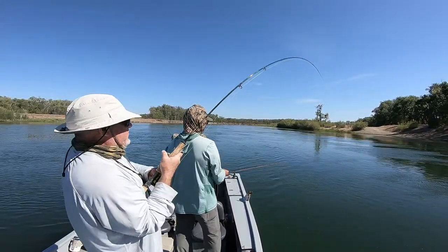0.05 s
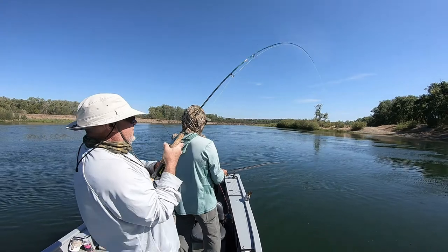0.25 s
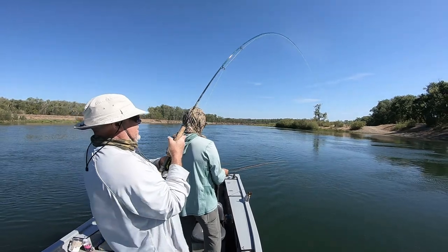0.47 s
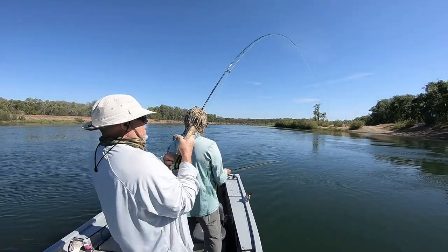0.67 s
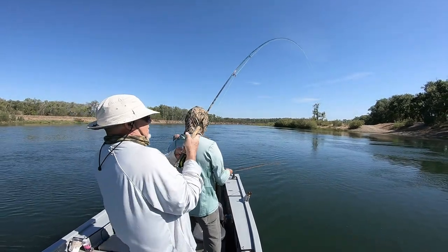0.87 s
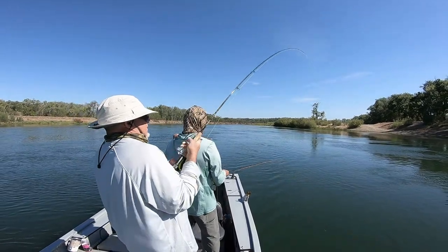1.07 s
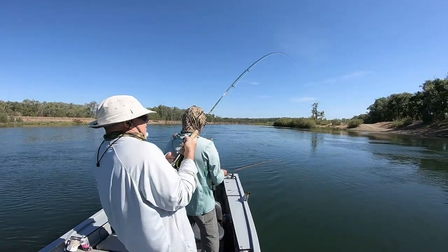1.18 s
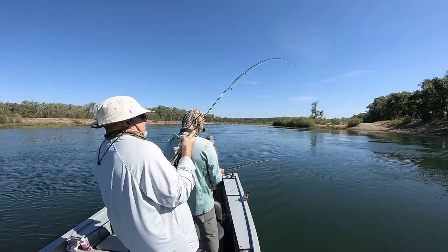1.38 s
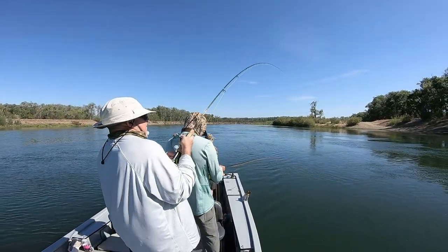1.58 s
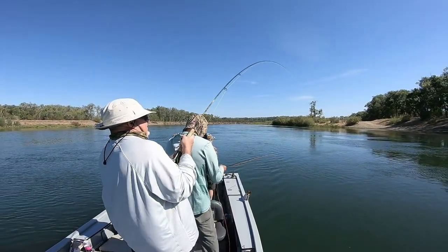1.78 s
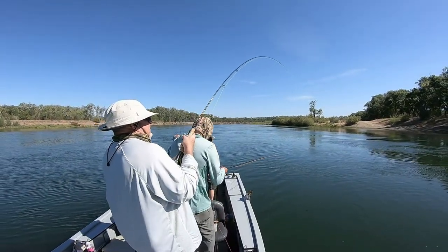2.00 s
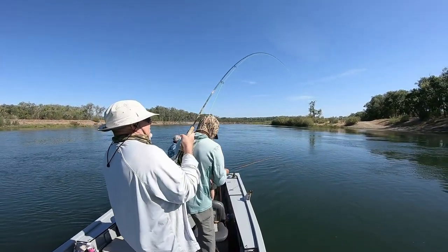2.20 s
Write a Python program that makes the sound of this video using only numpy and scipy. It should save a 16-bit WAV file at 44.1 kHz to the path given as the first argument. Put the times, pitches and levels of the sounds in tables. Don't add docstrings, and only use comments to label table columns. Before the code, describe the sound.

A fishing reel's ratchet clicks, close and outdoors on a small boat. Faint hull knocks and wind rumble, strongest near 0.3 s, come first. A soft double tick falls at 0.4 s, then crisp metallic clicks from 0.6 s, dense and uneven from 0.8 to 1.8 s, with tiny rings. Low gusts buffet each side around 0.9-1.6 s. Light hull knocks and fading wind follow over faint water hiss.

```python
import sys
import numpy as np
from scipy import signal
from scipy.fft import rfft, irfft
from scipy.io import wavfile

SR = 44100
rng = np.random.default_rng(int(sys.argv[2]) if len(sys.argv) > 2 else 0)


def gain_from_db(level_db):
    decades = np.asarray(level_db, float) / 20
    return 10 ** decades


def pcm_store(signal):
    levels = np.round(np.clip(np.atleast_2d(signal), -1, 1) * 32767)
    wavfile.write(sys.argv[1], SR, levels.astype(np.int16).T)


N = 99225

# start_s [s], peak_db [dB], snap_hz [Hz], most excited frame pitch ring_hz [Hz]
PAWL_DROPS = [(0.4217, -51, 4550, 6400), (0.4396, -39, 6060, 2840), (0.6201, -33, 6150, 2470),
              (0.6856, -33, 6050, 5300), (0.7745, -30.5, 6700, 6550), (0.8004, -47, 5400, 5300),
              (0.8305, -33.5, 6600, 6230), (0.8696, -30.5, 7370, 6700), (0.9361, -32.5, 6720, 6800),
              (0.9946, -34.5, 6500, 6800), (1.0297, -31, 6000, 6750), (1.0727, -39, 5700, 6450),
              (1.0799, -29, 6350, 6300), (1.1659, -31.5, 5720, 5290), (1.2049, -32.5, 4550, 7040),
              (1.2114, -29.5, 7610, 7550), (1.2439, -32, 8060, 7400), (1.2866, -32.5, 7630, 6400),
              (1.3257, -34, 5840, 6350), (1.3607, -33.5, 4800, 6550), (1.4171, -32, 5960, 6600),
              (1.4834, -33, 5160, 6500), (1.5225, -37, 4800, 5400), (1.5531, -30, 6050, 5250),
              (1.6101, -32, 7600, 6500), (1.6809, -38, 5900, 6510), (1.7392, -32, 6630, 6860),
              (1.8137, -36, 6800, 6800)]
# start_s [s], peak_db [dB], snap_hz [Hz]
PAWL_SLIPS = [(0.617, -42, 7160), (0.6788, -52, 7000), (0.7695, -39, 7700), (0.8286, -51, 7700),
              (0.8676, -44, 7060), (0.8785, -45, 8300), (0.9298, -41.5, 6800), (0.993, -45, 6660),
              (1.0272, -39.5, 7200), (1.0633, -47, 4960), (1.163, -45, 5840), (1.208, -34.5, 4480),
              (1.2423, -49, 8450), (1.2845, -41, 7200), (1.3234, -34.5, 6840), (1.358, -45.5, 7000),
              (1.4133, -41.5, 7060), (1.4811, -35.5, 6700), (1.5487, -43, 7000), (1.6062, -38.5, 7560),
              (1.677, -48, 7700), (1.7368, -42, 4540), (1.807, -44, 6200)]
# pitch_hz [Hz], level_db [dB]
FRAME_MODES = [(2300, -2), (2880, -1), (3400, -3), (4490, -4), (5290, 0), (6450, 0), (7080, -2), (7850, -2),
               (8400, -3), (9100, -5)]
# frequency_hz [Hz], density_db [dB per Hz]
CRACK_COLOUR = [(1900, -41.5), (2350, -7), (3800, -10), (6500, -3), (8500, -3.5), (10500, -20.5),
                (13000, -20.5), (15500, -23)]
# start_s [s], peak_db [dB], pitch_hz [Hz]
SPOOL_BODY = [(0.4209, -55.5, 2810), (0.4394, -43.5, 2840), (0.619, -43, 2296), (0.6843, -49, 3470),
              (0.7731, -43.5, 2520), (0.8295, -49, 3220), (0.8689, -57, 3300), (0.9353, -47.5, 2730),
              (0.9941, -48.5, 2290), (1.0291, -39, 2510), (1.0715, -50, 3280), (1.0789, -40.5, 2850),
              (1.1653, -44.5, 2390), (1.2047, -43, 2580), (1.2104, -47, 2330), (1.2426, -44, 3270),
              (1.2865, -43.5, 3300), (1.3249, -49, 2700), (1.3598, -47, 2220), (1.4162, -43, 2730),
              (1.4825, -45, 2400), (1.5214, -54, 2390), (1.5519, -46, 3320), (1.6087, -43, 2394),
              (1.6791, -50.5, 2940), (1.7384, -72, 3600), (1.8133, -59, 2570)]
# start_s [s], peak_db [dB], pitch_hz [Hz]
SPOOL_FLANGE = [
    (0.619, -45.5, 4340),
    (0.6849, -47.5, 4040),
    (0.775, -59, 4350),
    (0.8275, -62, 4500),
    (1.0274, -41.5, 4360),
    (1.3249, -40, 4460),
    (1.6092, -46, 4360),
    (1.7357, -60, 4400),
]
# start_s [s], peak_db [dB], pitch_hz [Hz]
SPRING_GLINTS = [(.438, -48, 11270), (.619, -37, 9750), (.685, -49, 10900), (.8286, -40.5, 10270),
                 (.868, -41.5, 11400), (.9936, -43, 12200), (1.0794, -35.5, 9340), (1.2108, -58, 14700),
                 (1.2431, -46.5, 10200), (1.286, -42, 12000), (1.483, -42, 9900), (1.5524, -41.5, 10460)]
# centre_s [s], level_db [dB], pitch_hz [Hz]
LEFT_EDDIES = [(0.26, -22.5, 68), (0.299, -14.5, 99.3), (0.375, -14, 105.3), (0.318, -33.5, 373),
               (0.462, -28.5, 114), (0.485, -26, 95), (0.633, -34.5, 63), (0.935, -32.5, 168),
               (1.025, -21, 63.7), (1.064, -28, 75.5), (1.111, -18.5, 79.5), (2.02, -33, 130),
               (1.478, -29, 91), (1.515, -24, 95), (1.537, -22.5, 79), (1.599, -27, 99), (1.893, -30, 143)]
# centre_s [s], level_db [dB], pitch_hz [Hz]
RIGHT_EDDIES = [(0.206, -20.5, 79.4), (0.265, -32.5, 161), (0.235, -18, 99.5), (0.274, -15.5, 98),
                (0.325, -9.5, 159), (0.417, -33, 72.8), (0.455, -24.5, 126.7), (0.524, -50, 74.6),
                (0.562, -22.5, 71.6), (0.607, -54, 68.4), (0.881, -19, 69), (0.944, -14, 85),
                (1.008, -16, 131), (1.052, -14, 81), (1.106, -18.5, 131), (1.136, -15.5, 61),
                (1.175, -22, 78), (1.212, -22, 84), (1.264, -12.5, 104), (1.3, -18, 64),
                (1.392, -20.5, 131.5), (1.474, -17.5, 58), (1.547, -10, 86.4), (1.723, -24, 70),
                (1.867, -26, 135), (1.975, -22, 69)]
# start_s [s], level_db [dB], left_minus_right_db [dB]
AIRFLOW = [(0, -41.5, -4), (.13, -48, -1), (.24, -31.5, -3.5), (.6, -29.5, -5), (.8, -43.5, -6.5),
           (.95, -30, -6.5), (1.25, -31.5, -1.5), (1.34, -41.5, -8.5), (1.5, -24, -7.5), (1.68, -43, -6.5),
           (1.9, -30, -5), (2.2, -41, -3)]
# frequency_hz [Hz], density_db [dB per Hz]
AIRFLOW_COLOUR = [(20, -5), (45, 0), (150, -6), (330, -30.5), (600, -40), (1500, -72)]
# start_s [s], level_db [dB], t60_s [s], tilt_db [dB per octave]
HULL_KNOCKS = [
    (.004, -49, 0.49, 3.5),
    (0.041, -45, 0.11, 5.5),
    (0.107, -46.5, 0.29, -0.5),
    (0.471, -51, 0.32, 3.5),
    (0.543, -44.5, 0.23, 1.5),
    (1.838, -37.5, 0.24, 2),
    (1.872, -53.5, 0.5, 4.5),
    (1.915, -56.5, 0.32, 6),
    (1.997, -47, 0.25, -1.5),
]
# frequency_hz [Hz], density_db [dB per Hz]
HULL_COLOUR = [(150, -17.5), (300, 3), (600, 5.5), (1100, -3), (3000, -23), (4400, -32.5), (6100, -28.5),
               (12000, -57)]
# start_s [s], level_db [dB], t60_s [s], pitch_hz [Hz]
PANEL_HUMS = [
    (.006, -48.5, 0.26, 866),
    (.006, -54, 0.23, 586),
    (.04, -49, 0.092, 1110),
    (.108, -50, 0.33, 432),
    (1.105, -41, 0.36, 591),
    (1.36, -53, 0.38, 866),
    (1.36, -47, 0.28, 624),
    (1.41, -42, 0.2, 570),
    (1.525, -35.5, 0.09, 480),
]
# start_s [s], whirr_db [dB], river_db [dB]
BED_LEVELS = [(0, -74.5, -66.5), (.6, -76, -64.5), (.9, -69.5, -63), (1.05, -73, -53.5),
              (1.4, -70.5, -54.5), (1.65, -70, -67), (1.8, -77, -72.5), (1.92, -75, -73), (2.1, -80.5, -72)]
# frequency_hz [Hz], density_db [dB per Hz]
RIVER_COLOUR = [(250, -6.5), (800, 4.5), (1100, -2.5), (3000, -10), (6400, -19), (13000, -50),
                (16000, -47.5)]
# frequency_hz [Hz], density_db [dB per Hz]
WHIRR_COLOUR = [(1500, -3.5), (2500, 7.5), (4200, 5.5), (5200, 0), (6300, 8.5), (9000, -0.5), (12000, -8),
                (16000, -45)]
# frequency_hz [Hz], phase by which left leads lead_rad [rad]
PORT_LEAD = [(340, 1.24), (1200, 2.56), (2300, 1.2), (4000, 0.62), (7000, 1.43), (13000, 0.26)]

SNAP_S, SNAP_DB = 0.00045, -3
CRACK_DB, CRACK_T60_S, FOCUS_DB = -4, 0.0045, 5
RATTLE_DB, RATTLE_T60_S = -21, 0.04
RING_DB, RING_T60_S, PICK_DB = -13, 0.03, 40
BODY_T60_S, BODY_WIDTH_HZ = 0.024, 200
GLINT_T60_S, GLINT_WIDTH_HZ = 0.015, 1800
EDDY_S, EDDY_TRIM_DB = 0.058, -1
EDDY_FALL_DB, EDDY_RISE_DB, EDDY_TOP = 21, 1, 1.33
LEAK_DB, LEAK_HZ = -9.5, 230
RIVER_FOLLOWS, LOOSE_DB = 0.54, -5
REEL_PAN_DB, HULL_PAN_DB, UNLIKE_DB = -3, -4, -6


def at_hz(points, hz):
    f, v = np.transpose(points)
    return np.interp(np.log(np.maximum(hz, 1)), np.log(f), v)


def in_time(rows):
    s, *columns = np.transpose(rows)
    return [np.interp(np.arange(N) / SR, s, c) for c in columns]


def coloured(size, db_at):
    hz = np.arange(size // 2 + 1) * SR / size + 0.0019
    x = irfft(rfft(rng.standard_normal(size)) * gain_from_db(db_at(hz)), size)
    return x / np.sqrt(np.mean(x ** 2))


def resonance(hz, width_hz):
    return lambda f: -20 * np.log10(1 + ((f - hz) / width_hz) ** 2)


def flicker(rate_hz, depth_db):
    points = rng.standard_normal(400)
    return gain_from_db(depth_db * np.interp(np.arange(N) * rate_hz / SR, np.arange(400), points))


def add(out, start_s, piece):
    i = max(int(start_s * SR), 0)
    out[..., i:i + piece.shape[-1]] += piece[..., :out.shape[-1] - i]


def dying(t60_s, rise_s, size):
    t = np.arange(size) / SR
    return (1 - np.exp(-(t / rise_s) ** 2)) * gain_from_db(-60 * t / t60_s)


def ports(x, pan_db):
    turn = np.exp(0.5j * at_hz(PORT_LEAD, np.arange(N // 2 + 1) * SR / N))
    left = irfft(rfft(x) * turn, N) * gain_from_db(pan_db / 2)
    right = irfft(rfft(x) / turn, N) * gain_from_db(-pan_db / 2)
    return np.array([left, right])


def contact_crack(snap_hz, focus_db):
    patches = 5.8 * rng.standard_normal(24)

    def colour(f):
        focus = -focus_db * np.log2(f / snap_hz) ** 2
        return at_hz(CRACK_COLOUR, f) + focus + np.interp(f / 1000, np.arange(24), patches)

    noise = np.array([coloured(4096, colour) for _ in range(3)])
    return gain_from_db(CRACK_DB) * noise * dying(CRACK_T60_S, 0.00015, size=4096)


def contact_rattle():
    lumps = gain_from_db(4 * np.repeat(rng.standard_normal(128), 32))
    noise = np.array([coloured(4096, lambda f: at_hz(CRACK_COLOUR, f) - f / 1500) for _ in range(3)])
    return gain_from_db(RATTLE_DB) * noise * lumps * dying(RATTLE_T60_S, 0.00044, size=4096)


def frame_ring(favoured_hz):
    hz, db = np.transpose(FRAME_MODES)[:, :, None]
    pick_db = -np.minimum(PICK_DB * np.abs(np.log2(hz / favoured_hz)), 16)
    gain = gain_from_db(db + RING_DB + pick_db + rng.normal(0, 2, hz.shape))
    detuned_hz = hz * rng.normal(1, 0.012, hz.shape)
    modes = gain * np.sin(2 * np.pi * detuned_hz * np.arange(4096) / SR)
    return modes.sum(axis=0) * dying(RING_T60_S, 0.0004, size=4096)


def reel():
    near, loose, t = np.zeros(N), np.zeros((2, N)), np.arange(4096) / SR
    slips = [(s, level, pitch, 0) for s, level, pitch in PAWL_SLIPS]
    for start_s, peak_db, snap_hz, ring_hz in list(PAWL_DROPS) + slips:
        snap = gain_from_db(SNAP_DB) * np.sin(2 * np.pi * snap_hz * t) * np.exp(-(t / SNAP_S - 1.5) ** 2)
        crack = contact_crack(snap_hz, FOCUS_DB if ring_hz else 3 * FOCUS_DB)
        ring = frame_ring(ring_hz or snap_hz)
        rattle = contact_rattle()
        add(near, start_s - SNAP_S, gain_from_db(peak_db) * (snap + crack[2] + ring + rattle[2]))
        add(near, start_s - 512 / SR, gain_from_db(peak_db - 10) * rattle[0][511::-1])
        add(loose, start_s - SNAP_S, gain_from_db(peak_db + UNLIKE_DB) * (rattle + crack)[:2])
    return ports(near, REEL_PAN_DB) + loose


def pings(rows, t60_s, width_hz, tone_db):
    out = np.zeros((3, N))
    for start_s, peak_db, hz in rows:
        noise = np.array([coloured(2048, resonance(hz, width_hz)) for _ in out])
        noise[0] += gain_from_db(tone_db) * np.sin(2 * np.pi * hz * np.arange(2048) / SR)
        burst = noise * dying(t60_s, 0.00042, size=2048)
        add(out, start_s, gain_from_db(peak_db - 5.5) * burst / np.abs(burst).max(axis=1, keepdims=True))
    return ports(out[0], REEL_PAN_DB) + gain_from_db(UNLIKE_DB) * out[1:]


def spool():
    return pings(list(SPOOL_BODY) + list(SPOOL_FLANGE), BODY_T60_S, BODY_WIDTH_HZ, tone_db=8.5)


def spring():
    return pings(SPRING_GLINTS, GLINT_T60_S, GLINT_WIDTH_HZ, tone_db=-2)


def eddies(rows):
    out = np.zeros(N)
    lump = np.maximum(1 - ((np.arange(8192) - 4096) / SR / EDDY_S * 2) ** 2, 0) ** 2
    for centre_s, level_db, hz in rows:
        def colour(f):
            octaves = np.log2(f / (EDDY_TOP * hz))
            return np.minimum(EDDY_RISE_DB * octaves, -EDDY_FALL_DB * octaves)

        noise = coloured(8192, colour)
        noise = noise - np.sum(noise * lump) / np.sum(lump)
        rms = np.sqrt(np.sum((noise * lump) ** 2) / np.sum(lump ** 2))
        add(out, centre_s - 4096 / SR, gain_from_db(level_db + EDDY_TRIM_DB) * noise * lump / rms)
    return out


def wind():
    level_db, pan_db = in_time(AIRFLOW)
    flow = []
    for side in (1, -1):
        gain = gain_from_db(level_db + side * pan_db / 2) * flicker(25.0, 0.76)
        flow.append(gain * coloured(N, lambda f: at_hz(AIRFLOW_COLOUR, f)))
    both = np.array(flow) + [eddies(LEFT_EDDIES), eddies(RIGHT_EDDIES)]
    high = signal.butter(2, LEAK_HZ, "high", fs=SR, output="sos")
    return both - gain_from_db(LEAK_DB) * signal.sosfilt(high, both[::-1])


def hull():
    out = np.zeros((3, N))
    low_pass = signal.butter(2, 1100, fs=SR, output="sos")
    for start_s, level_db, t60_s, tilt_db in HULL_KNOCKS:
        def colour(f):
            return at_hz(HULL_COLOUR, f) + tilt_db * np.log2(f / 600)

        noise = np.array([coloured(16384, colour) for _ in out])
        low = signal.sosfilt(low_pass, noise)
        lumps = gain_from_db(1.2 * np.interp(np.arange(16384) / 200, np.arange(90), rng.standard_normal(90)))
        slow = low * dying(t60_s, 0.002, size=16384)
        fast = (noise - low) * dying(0.7 * t60_s, 0.0021, size=16384)
        add(out, start_s, gain_from_db(level_db) * lumps * (slow + fast))
    for start_s, level_db, t60_s, hz in PANEL_HUMS:
        noise = coloured(16384, resonance(hz, 35))
        add(out[0], start_s, gain_from_db(level_db) * noise * dying(t60_s, 0.0065, size=16384))
    return ports(out[0], HULL_PAN_DB) + gain_from_db(-5.5) * out[1:]


def bed():
    whirr_db, river_db = in_time(BED_LEVELS)
    river_db = river_db.min() + RIVER_FOLLOWS * (river_db - river_db.min())

    def one():
        river = flicker(6.75, 5.2) * coloured(N, lambda f: at_hz(RIVER_COLOUR, f))
        whirr = flicker(60.0, 3.5) * coloured(N, lambda f: at_hz(WHIRR_COLOUR, f))
        return gain_from_db(river_db) * river + gain_from_db(whirr_db) * whirr

    return ports(one(), -2.5) + gain_from_db(LOOSE_DB) * np.array([one(), one()])


def scene():
    return wind() + bed() + hull() + reel() + spool() + spring()


def roll_off(x):
    return signal.sosfilt(signal.butter(12, 16190, fs=SR, output="sos"), x)


def record(dry):
    cut = signal.cheby2(12, 50, 16200, fs=SR, output="sos")
    mix = signal.sosfilt(cut, dry)
    return roll_off(mix)


dry = scene()
out = record(dry)
pcm_store(out)
```